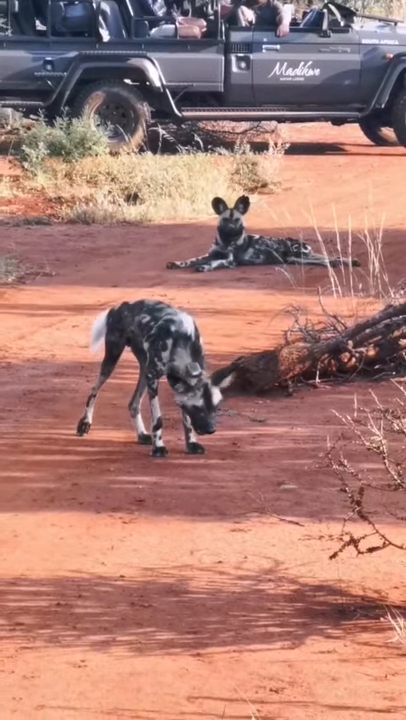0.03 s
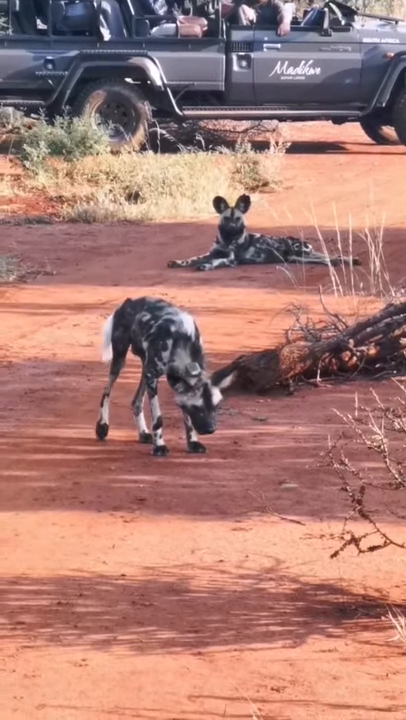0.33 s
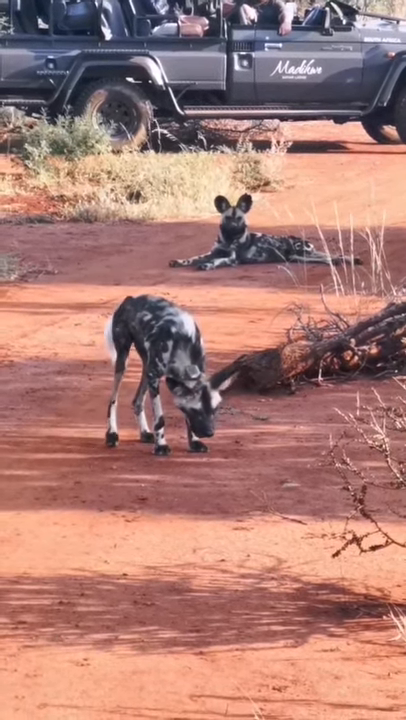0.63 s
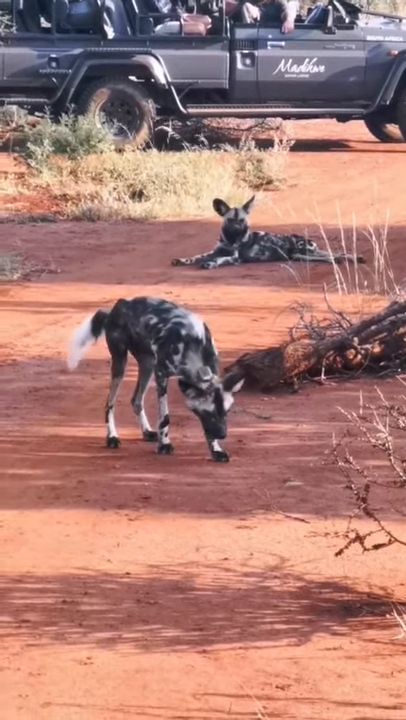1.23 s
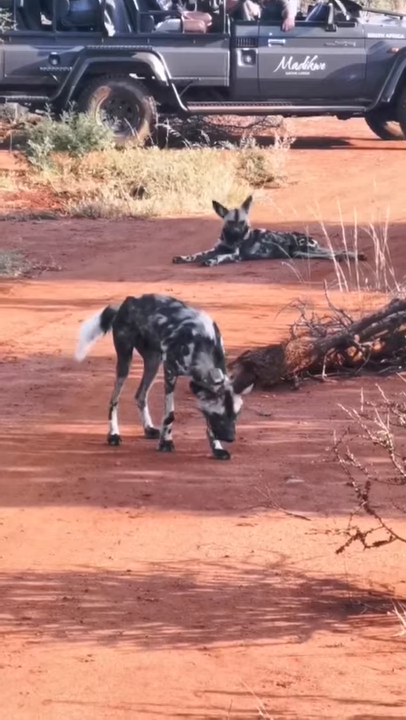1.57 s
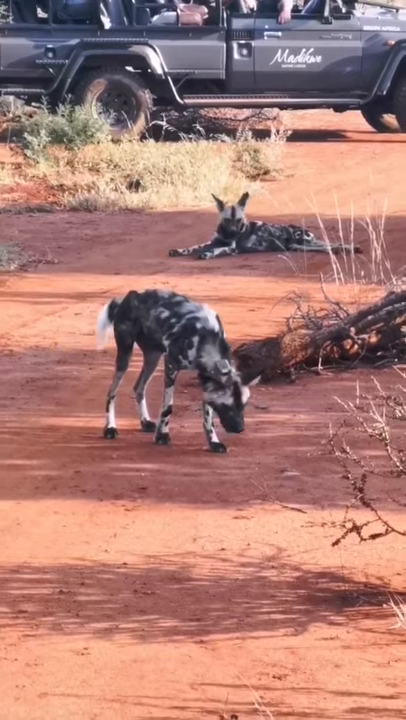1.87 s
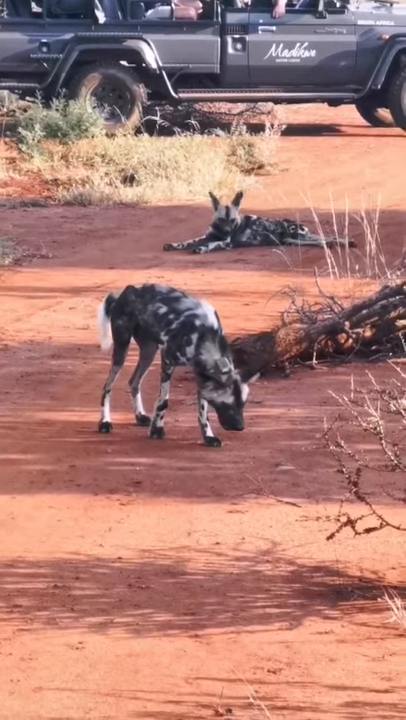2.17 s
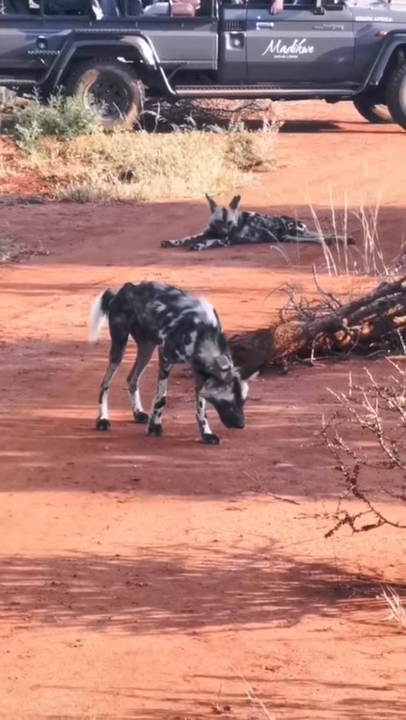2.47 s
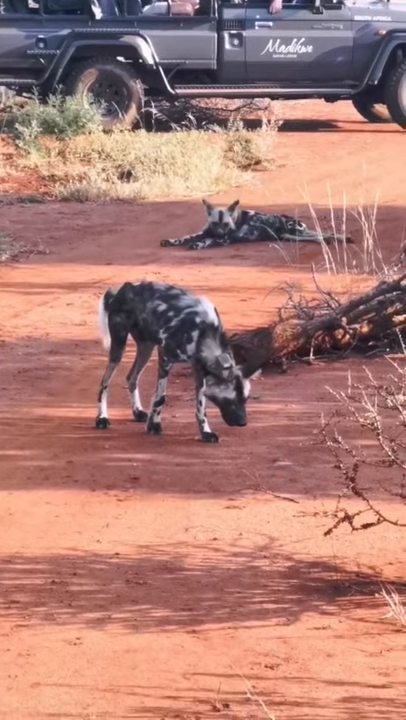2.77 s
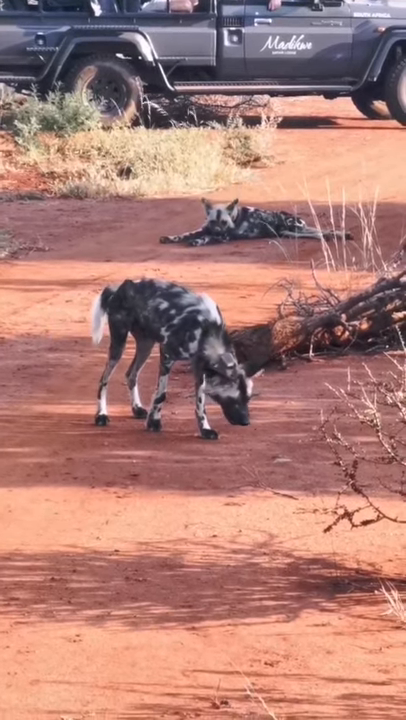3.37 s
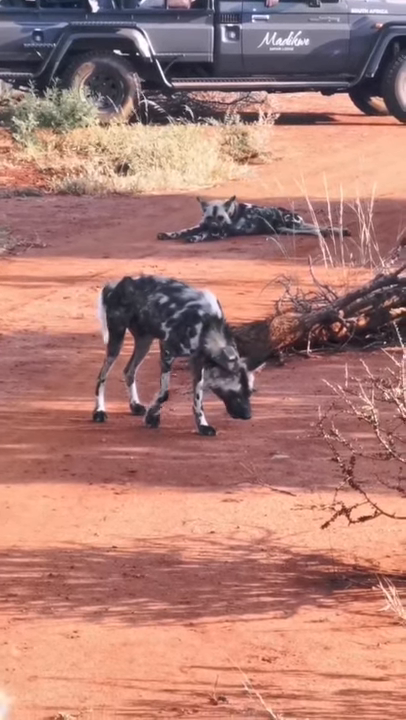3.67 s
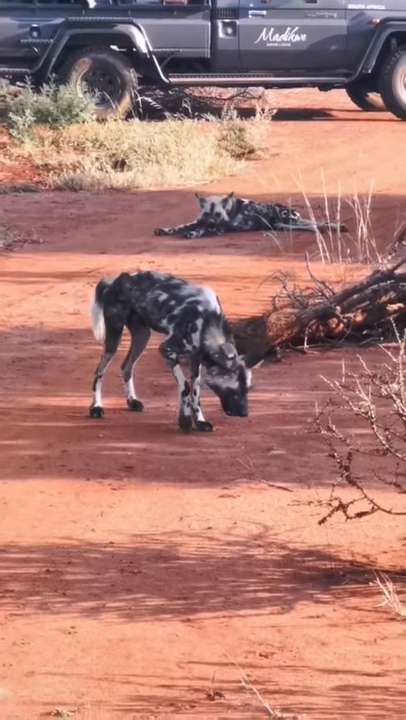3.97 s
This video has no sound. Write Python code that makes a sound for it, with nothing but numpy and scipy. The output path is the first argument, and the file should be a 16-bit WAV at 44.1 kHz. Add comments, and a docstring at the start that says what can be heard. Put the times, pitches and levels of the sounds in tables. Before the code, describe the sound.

A wild dog whines six times outdoors, at the start and around 0.7, 1.5, 2.3, 3 and 3.7 seconds. Each yelp slides up to a thin note, most ending in a tiny nose squeak. A lower hoot swells underneath, taking over near 1 and 1.7 seconds. After an opening thump, wind rumbles and knocks on the microphone. Faint dry rustling lasts until about 2 seconds, and a distant bird chirps.

```python
"""A wild dog whines six times on open sandy ground. Each call opens with a yelp and slides up to a thin held
note; a lower hoot swells beneath five of them and twice takes over. Air through the nose ends most calls in a
tiny falling squeak. Wind, loud at the very start, rumbles and knocks on the microphone; something dry rustles
close by, and a small bird chirps far off."""
import sys
import numpy as np
from scipy import signal
from scipy.fft import rfft, irfft
from scipy.io import wavfile
from scipy.ndimage import uniform_filter1d

SR = 44100
rng = np.random.default_rng(int(sys.argv[2]) if len(sys.argv) > 2 else 0)


def int16_out(signal):
    """Quantize to a 16-bit WAV file."""
    q = np.round(np.clip(np.atleast_2d(signal).T, -1, 1) * 32767)
    wavfile.write(sys.argv[1], SR, q.astype(np.int16))


N = 176400
TIME = np.arange(N) / SR
BIN_HZ = np.arange(N // 2 + 1) * SR / N
JITTER, JITTER_HZ = 0.003, 45   # voice unsteadiness: relative pitch spread, bandwidth

# Spectrum of air rushing with the voice: (frequency [Hz], level [dB])
BREATH = [(1200, 4), (1500, -3), (2050, 4.5), (2450, -10), (3700, -8.5), (4400, -13), (5100, -9),
          (5700, -21), (6300, -10), (7400, -24), (8300, -2), (9000, -22), (10200, -23), (11300, -24),
          (12400, -36), (15000, -45.5)]


def from_db(db):
    """Decibels to gain."""
    return 10 ** (np.asarray(db) / 20)


def unit_rms(x):
    """Scale to RMS 1."""
    return x / np.sqrt(np.mean(x ** 2) + 1e-20)


def evened(x):
    """Unit RMS over about 50 ms; quicker lumps stay."""
    return x / np.sqrt(uniform_filter1d(uniform_filter1d(x ** 2, SR // 20), SR // 40) + 1e-20)


def db_at(spectrum, hz):
    """Read a spectrum on a log-frequency axis."""
    knots_hz, db = np.transpose(spectrum)
    return np.interp(np.log(np.maximum(hz, 1)), np.log(knots_hz), db)


def curves(rows, smooth_s=0.004):
    """Columns of a timed table at every sample, corners rounded."""
    times_s, *columns = np.transpose(rows)
    return [uniform_filter1d(np.interp(TIME, times_s, c), int(smooth_s * SR)) for c in columns]


def gate(rows, fade_s=0.006):
    """Open over the span of a timed table, short fades outside."""
    return np.clip(1 + np.minimum(TIME - rows[0][0], rows[-1][0] - TIME) / fade_s, 0, 1)


def colour(x, spectrum):
    """Filter by a spectrum; unit RMS."""
    return unit_rms(irfft(rfft(x) * from_db(db_at(spectrum, BIN_HZ)), N))


def noise(spectrum):
    """Steady coloured noise."""
    return colour(rng.standard_normal(N), spectrum)


def drift(width_hz, centre_hz=0):
    """Random wander in a band round centre_hz; unit RMS."""
    spectrum = rfft(rng.standard_normal(N)) / (1 + ((BIN_HZ - centre_hz) / width_hz) ** 2)
    return unit_rms(irfft(spectrum, N))


def butter(x, hz, kind):
    """Second-order Butterworth filter."""
    return signal.sosfilt(signal.butter(2, hz, kind, fs=SR, output="sos"), x + 1e-18)


def glide(start_s, length_s, from_hz, to_hz, db, wobble):
    """Short sliding whistle."""
    out, on = np.zeros(N), (TIME > start_s) & (TIME < start_s + length_s)
    progress = (TIME[on] - start_s) / length_s
    hz = from_hz * (to_hz / from_hz) ** progress * (1 + wobble[on])
    envelope = from_db(db) * np.sqrt(2 * np.sin(np.pi * progress))
    out[on] = envelope * np.sin(2 * np.pi * np.cumsum(hz) / SR)
    return out


def voice(hz, overtones_db, tilt_db_per_oct, harmonics):
    """Fundamental and weak overtones; each overtone passes the airway and flickers on its own."""
    # Throat and nose resonances: (frequency [Hz], overtone gain [dB])
    airway = [(1270, -31.5), (1500, -33.5), (1820, -24), (2100, -37), (2400, -44), (2730, -35),
              (3150, -46.5), (3700, -35), (4150, -42.5), (4600, -42.5), (5130, -36), (5600, -61.5),
              (6250, -51.5), (7200, -68.5), (8300, -37), (9200, -69.5), (10200, -69), (11300, -55),
              (12500, -79.5), (15000, -84.5)]
    pivot_hz, flicker_db, flicker_per_s = 3840, 3, 110
    phase, overtones = 2 * np.pi * np.cumsum(hz) / SR, 0
    for k in range(2, harmonics + 1):
        flicker = np.interp(TIME[:len(hz)] * flicker_per_s, np.arange(100), rng.standard_normal(100))
        db = db_at(airway, k * hz) + tilt_db_per_oct * np.log2(k * hz / pivot_hz) + flicker_db * flicker
        overtones += from_db(overtones_db + db) * np.sin(k * phase)
    return np.sqrt(2) * np.sin(phase), np.sqrt(2) * overtones


def whines():
    """Upper voice: clean in the yelp, fluttering and airy in the high register."""
    # Whine contours, one list per call: (time [s], pitch [Hz], level [dB])
    calls = [
        [(0.0, 873, -15), (0.028, 945, -12.5), (0.04, 948, -25.5), (0.048, 1038, -21.5), (0.062, 1061, -22),
         (0.12, 1074, -19.5), (0.242, 1053, -22), (0.288, 1074, -41), (0.3, 1007, -41)],
        [(0.708, 850, -59), (0.716, 893, -20), (0.732, 904, -11.5), (0.754, 943, -12.5), (0.762, 1056, -21.5),
         (0.778, 1058, -18.5), (0.918, 1067, -17.5), (0.941, 1045, -18.5)],
        [(1.472, 919, -48.5), (1.486, 882, -18.5), (1.508, 915, -11), (1.526, 934, -20.5), (1.536, 1047, -20.5),
         (1.644, 1037, -17), (1.675, 1027, -20.5)],
        [(2.283, 874, -61.5), (2.295, 902, -18.5), (2.311, 922, -9), (2.327, 886, -19), (2.335, 1060, -19.5),
         (2.343, 1045, -21.5), (2.493, 1035, -16.5), (2.573, 1026, -21), (2.627, 1053, -33.5),
         (2.635, 914, -33.5)],
        [(2.98, 894, -63), (3.01, 1002, -31), (3.116, 1036, -26), (3.134, 932, -13.5), (3.148, 1037, -16),
         (3.16, 1049, -23.5), (3.212, 1026, -18), (3.402, 1014, -17.5), (3.444, 1022, -21), (3.475, 1080, -41)],
        [(3.685, 857, -57), (3.701, 841, -29.5), (3.725, 871, -20), (3.787, 910.5, -12.5), (3.867, 929.7, -14),
         (3.917, 919, -16.5), (3.929, 1060, -28), (3.96, 1000, -42.5)],
    ]
    # Timbre per call: (overtone gain [dB], overtone tilt [dB/octave], breath gain [dB])
    timbres = [(2.5, 3.5, 0), (-0.5, -1, -2), (1, 0, -7), (-2, 0, -1), (-0.5, 2.5, -7), (-5.5, -6.5, -8.5)]
    register_hz, loud_db, gain_db = 923, -24.5, -2
    out, breath = np.zeros(N), from_db(-22.5) * butter(noise(BREATH), 950, "high")
    wobble, shimmer = JITTER * drift(JITTER_HZ), 0.05 * drift(JITTER_HZ)
    flutter = 0.036 * butter(drift(85, centre_hz=100), 200, "low")
    # The yelp's pitch lingers hoarsely under the held note.
    undertone = from_db(-16.5) * unit_rms(butter(drift(33, centre_hz=916), [800, 1100], "band"))
    for rows, (overtones_db, tilt_db_per_oct, breath_db) in zip(calls, timbres):
        on = gate(rows) > 0
        hz, db = [c[on] for c in curves(rows)]
        high = 0.5 + 0.5 * np.tanh((hz - register_hz) / 30)
        rough = 0.11 + 0.62 * high
        linger_db = 0.051 * (loud_db - db)   # overtones fade more slowly than the fundamental
        hz = hz * (1 + wobble[on])
        tone, overtones = voice(hz, overtones_db + linger_db, tilt_db_per_oct, harmonics=13)
        tone *= 1 + shimmer[on] * rough + flutter[on] * high
        call = tone + overtones + high * undertone[on] + from_db(breath_db) * rough * breath[on]
        out[on] += gate(rows)[on] * from_db(db + gain_db) * call
    return out


def wind():
    """Lumpy rumble on the microphone; higher octaves come in sharper lumps."""
    # Loud at the very start, then gusts: (time [s], deep level [dB], upper level [dB])
    envelope = [(0.0, -37, 2.5), (0.08, -27, -26.5), (0.12, -19, -20), (0.21, -22.5, -10),
                (0.24, -19, -19.5), (0.33, -18.5, -7.5), (0.41, -22, -38.5), (0.53, -22.5, -41.5),
                (0.66, -18, -18), (0.78, -23.5, -30), (0.89, -19, -21.5), (1.14, -23, -24),
                (1.185, -17.5, -13), (1.24, -16.5, -21), (1.28, -18, -23), (1.31, -22, -15.5),
                (1.42, -16, -11.5), (1.54, -24.5, -34), (1.61, -25.5, -43), (1.66, -10.5, -22),
                (1.75, -31, -39.5), (1.82, -16, -18.5), (1.87, -40, -45), (1.91, -13.5, -30.5),
                (2.01, -28, -56), (2.04, -11.5, -25), (2.18, -27.5, -29), (2.21, -13.5, -29.5),
                (2.31, -41, -51), (2.35, -8.5, -31), (2.4, -23.5, -28), (2.61, -18, -20),
                (2.78, -23.5, -52), (2.86, -18.5, -33.5), (2.94, -12.5, -25.5), (3.0, -37, -36),
                (3.04, -15.5, -26), (3.2, -25, -53.5), (3.35, -16.5, -29.5), (3.4, -29, -45.5),
                (3.51, -12.5, -12), (3.55, -19, -30.5), (3.69, -19, -28), (3.74, -31, -64),
                (3.9, -16.5, -16), (4.0, -27.5, -33)]
    # Rumble spectrum: (frequency [Hz], level [dB])
    spectrum = [(20, 8.5), (40, 0), (70, 3.5), (110, -1), (170, -3), (250, -7.5), (350, -13.5),
                (500, -25.5), (700, -36.5), (1100, -53.5), (2000, -62.5)]
    lump_db, lump_db_per_oct, lump_hz, split_hz = 2.5, 1.46, 31.7, 157.6
    rumble, common_lumps = 0, drift(lump_hz)
    for octave in range(7):
        low_hz = 20 * 2 ** octave
        lumps = 0.67 * common_lumps + 0.5 * drift(lump_hz)
        swell = unit_rms(from_db((lump_db + lump_db_per_oct * octave) * lumps))
        rumble += swell * butter(noise(spectrum), [low_hz, 2 * low_hz], "band")
    deep_db, upper_db = curves(envelope, smooth_s=0.014)
    deep, upper = evened(butter(rumble, split_hz, "low")), evened(butter(rumble, split_hz, "high"))
    return from_db(deep_db - 2) * deep - from_db(upper_db - 5) * upper


def rustle():
    """Dry rubbing with gritty ticks, louder crunches and a bright scrape under the third call."""
    # Rubbing envelope: (time [s], level [dB])
    envelope = [(0, -73), (.28, -47), (.36, -53), (.41, -77), (.52, -70), (.66, -70), (.71, -76), (.8, -66),
                (1.02, -50), (1.25, -53.5), (1.3, -67), (1.35, -67.5), (1.39, -57), (1.6, -48),
                (1.8, -51.5), (1.87, -58), (1.92, -75), (4, -74.5)]
    # Rustle spectrum: (frequency [Hz], level [dB])
    spectrum = [(700, 3), (1300, 5), (2000, 1), (2800, 2.5), (4500, -3), (6500, -10.5), (8500, -11.5),
                (10500, -21.5), (13000, -28), (15500, -40.5)]
    # Crunches: (time [s], level [dB])
    crunches = [(0.156, -41), (0.297, -41), (0.551, -50.5), (.637, -59), (0.659, -55.5), (1.05, -42.5),
                (1.157, -43.5), (1.191, -37), (1.484, -40), (1.383, -41.5), (1.425, -56), (1.442, -37),
                (1.575, -43.5), (1.639, -37)]
    crunch_s, grain_db, ticks_per_s, scrape_at_s, scrape_s = 0.012, 4, 210, 1.605, 0.18
    level = from_db(curves(envelope)[0])
    for start_s, db in crunches:
        age = np.maximum(TIME - start_s, 0) / crunch_s
        level += from_db(db) * np.minimum(10 * age, 1) * np.exp(-age)
    rub = unit_rms(rng.standard_normal(N) * from_db(grain_db * drift(70)))
    ticks = (rng.random(N) < ticks_per_s / SR) * rng.choice([-1, 1], N)
    ticks = ticks * from_db(3 * np.minimum(rng.exponential(1, N), 4))
    gritty_rub = colour(rub + from_db(-3.5) * unit_rms(ticks), spectrum)
    scrape_level = from_db(-64) * np.exp(-((TIME - scrape_at_s) / scrape_s) ** 2)
    scrape = scrape_level * unit_rms(butter(rub, [8500, 14500], "band"))
    return level * unit_rms(butter(gritty_rub, 600, "high")) + scrape


def still_air():
    """Faint steady background."""
    # Still-air spectrum: (frequency [Hz], level [dB])
    spectrum = [(300, -0.5), (800, 6), (1500, -9), (3000, -15), (5000, -8), (6000, -17.5), (9000, -26),
                (11000, -24.5), (15000, -30)]
    return from_db(-68.5) * noise(spectrum)


def hoots():
    """Lower voice: a hoarse resonance while weak, locking into a tone as it grows."""
    # Hoot envelopes, one list per call: (time [s], level [dB])
    calls = [
        [(0.06, -53), (0.124, -33.5), (0.24, -24.5), (0.258, -26), (0.29, -38)],
        [(0.82, -34), (0.87, -45), (0.952, -10), (0.988, -10.5), (1.018, -18), (1.035, -47.5)],
        [(1.57, -35), (1.596, -29), (1.644, -25), (1.682, -9), (1.758, -12), (1.79, -16.5), (1.808, -28.5)],
        [(2.37, -48), (2.394, -43), (2.526, -33.5), (2.542, -39), (2.582, -26), (2.602, -37.5), (2.63, -42.5)],
        [(3.18, -55), (3.2, -38.5), (3.25, -44.5), (3.314, -33.5), (3.336, -40.5), (3.43, -35.5), (3.46, -38)],
    ]
    # Final pitch per call: (pitch [Hz])
    end_pitches_hz = [622, 635, 630, 664, 610]
    sag_hz_per_s, lock_db, gain_db = 58, -33, -2
    cracks_at_s, crack_s = [0.945, 1.013, 1.671, 1.796], 0.014   # voice cracks between registers
    out, breath = np.zeros(N), from_db(-33) * butter(noise(BREATH), 1100, "high")
    wobble = JITTER * drift(JITTER_HZ)
    hoarse = unit_rms(butter(drift(22, centre_hz=np.mean(end_pitches_hz)), [520, 760], "band"))
    shimmer = 0.12 * drift(JITTER_HZ)
    cracks = sum(np.exp(-((TIME - at_s) / crack_s) ** 2) for at_s in cracks_at_s)
    wobble += 0.073 * cracks * drift(450)
    for rows, end_hz in zip(calls, end_pitches_hz):
        on = gate(rows) > 0
        db = curves(rows)[0][on]
        hz = (end_hz + sag_hz_per_s * (rows[-1][0] - TIME[on])) * (1 + wobble[on])
        tone, overtones = voice(hz, overtones_db=-6.5, tilt_db_per_oct=-1, harmonics=18)
        hoarse_share = 1 / (1 + from_db(db - lock_db) ** 2)
        call = np.sqrt(1 - hoarse_share) * (tone + overtones) + np.sqrt(hoarse_share) * hoarse[on]
        out[on] += gate(rows)[on] * from_db(db + gain_db) * (call * (1 + shimmer[on]) + breath[on])
    return out


def nose_squeaks():
    """Air rasps and whistles through the nose as the voice starts and stops."""
    # Rough falling squeaks: (time [s], length [s], from [Hz], to [Hz], level [dB])
    squeaks = [(0.299, 0.033, 9200, 5230, -50.5), (1.037, 0.027, 9200, 5100, -43.5),
               (1.801, .022, 9100, 8800, -45.5), (1.82, 0.032, 8270, 5800, -47.5),
               (2.629, 0.039, 9230, 5800, -47), (3.206, 0.034, 8200, 7470, -60),
               (3.468, 0.035, 9400, 7400, -50), (3.953, 0.035, 8200, 7000, -65.5)]
    # Clean whistles: (time [s], length [s], from [Hz], to [Hz], level [dB])
    whistles = [(.328, .01, 5300, 6400, -45.5), (1.059, 0.025, 5200, 5950, -48.5),
                (2.98, 0.074, 7940, 7710, -50), (3.022, 0.067, 7720, 7650, -54.5),
                (3.063, 0.12, 4170, 4030, -54.5), (3.17, 0.039, 4120, 4450, -54),
                (3.91, 0.051, 4000, 4210, -48.5), (2.272, 0.021, 8170, 8000, -56.5)]
    # Spectrum of the rasp opening each squeak: (frequency [Hz], level [dB])
    rasp = [(3000, -11.5), (5500, -13), (7500, -17), (8700, 2.5), (10000, -8), (11800, -15), (13000, -31),
            (15500, -43)]
    puff_s, wobble = 0.012, drift(180)
    puffs = sum(from_db(db - 1) * np.exp(-((TIME - start_s - puff_s) / puff_s) ** 2)
                for start_s, *_, db in squeaks)
    rough = sum(glide(*row, 0.058 * wobble) for row in squeaks)
    clean = sum(glide(*row, 0.001 * wobble) for row in whistles)
    return puffs * noise(rasp) + rough + clean


def buffets():
    """Single dull knocks of air on the microphone."""
    # Knocks: (time [s], level [dB])
    knocks = [(0.312, -6.5), (.703, -9), (1.222, -5), (1.362, -12.5), (1.392, -19.5), (1.907, -19.5),
              (2.04, -25.5), (2.064, -21), (2.21, -10.5), (2.34, -5.5), (2.593, -15), (2.699, -20),
              (3.49, -12)]
    decay_s, lowpass_hz, gain_db = 0.0079, 404, -2.5
    out, t = np.zeros(N), TIME[:SR // 10]
    for start_s, db in knocks:
        puff = rng.standard_normal(len(t)) * np.exp(-t / decay_s)
        puff = butter(butter(puff, lowpass_hz, "low"), 1.12 * lowpass_hz, "low")
        puff = butter(puff, 53, "high")
        start = int(start_s * SR)
        out[start:start + len(t)] += from_db(db + gain_db) * puff / np.abs(puff).max()
    return out


def bird():
    """Far triplets of falling chirps."""
    # Triplets: (time [s], level [dB])
    triplets = [(0.452, -71), (0.538, -78.5), (1.923, -66.5), (2.07, -69), (2.67, -64.5), (2.955, -69.5),
                (3.555, -74)]
    step_s, wobble = 0.037, 0.012 * drift(300)
    return sum(glide(start_s + k * step_s, length_s=0.026, from_hz=5050, to_hz=4630, db=db, wobble=wobble)
               for start_s, db in triplets for k in range(3))


def bush_echo(x):
    """Faint dull scatter from the surrounding bush."""
    t60_s, rise_s, t = 0.44, 0.028, TIME[:SR]
    envelope = from_db(-60 * t / t60_s) * np.minimum(t / rise_s, 1)
    tail = envelope * butter(rng.standard_normal(SR), 7300, "low")
    return from_db(-28) * signal.fftconvolve(x, tail / np.sqrt(np.sum(tail ** 2)))[:N]


def scene():
    """Dog and bird in the open, wind and rustling close by; mono."""
    animals = whines() + hoots() + nose_squeaks() + bird()
    return (animals + bush_echo(animals) + wind() + buffets() + rustle() + still_air())[None]


def record(dry):
    """Steep low-pass, 70 dB down from 15.7 kHz."""
    return signal.sosfilt(signal.cheby2(12, 70, 15700, fs=SR, output="sos"), dry)


dry = scene()
out = record(dry)
int16_out(out)
```